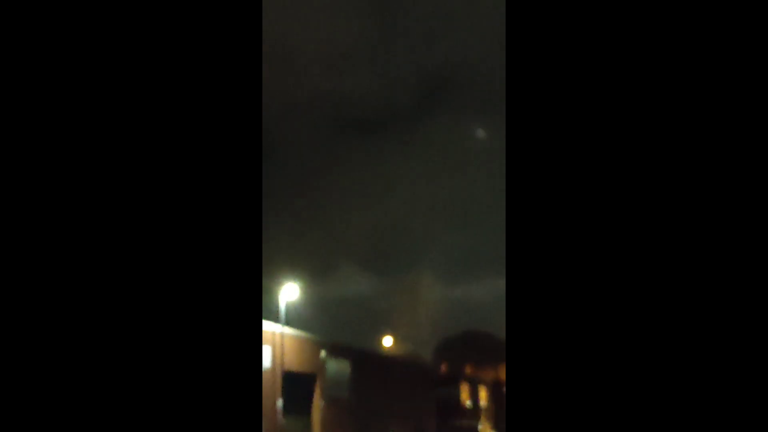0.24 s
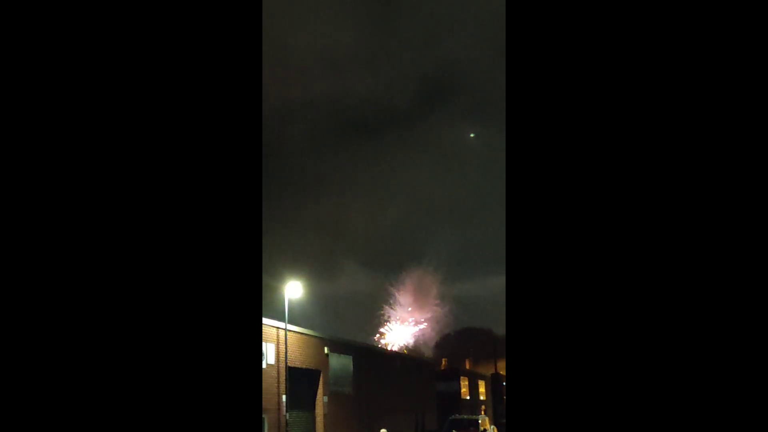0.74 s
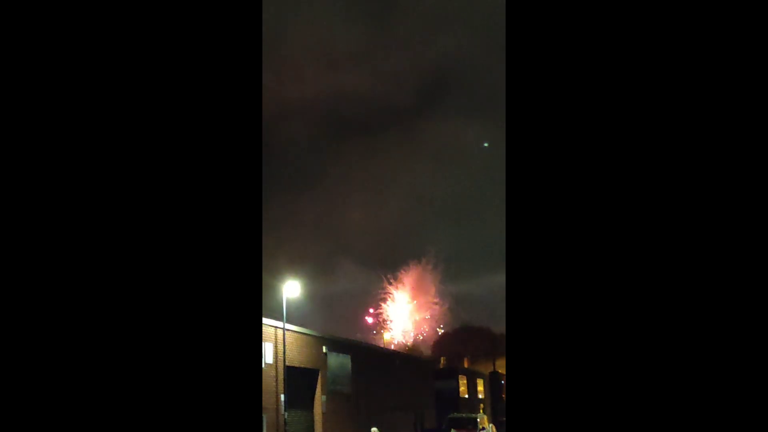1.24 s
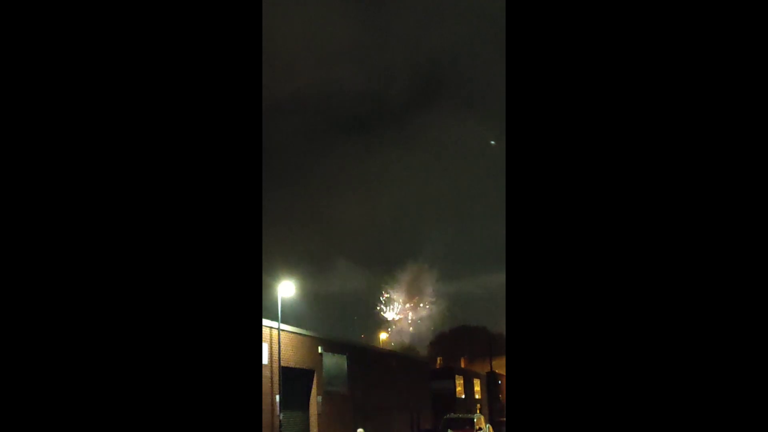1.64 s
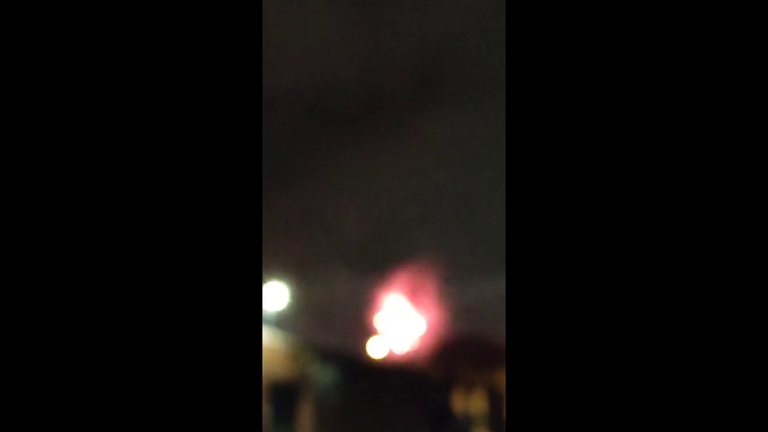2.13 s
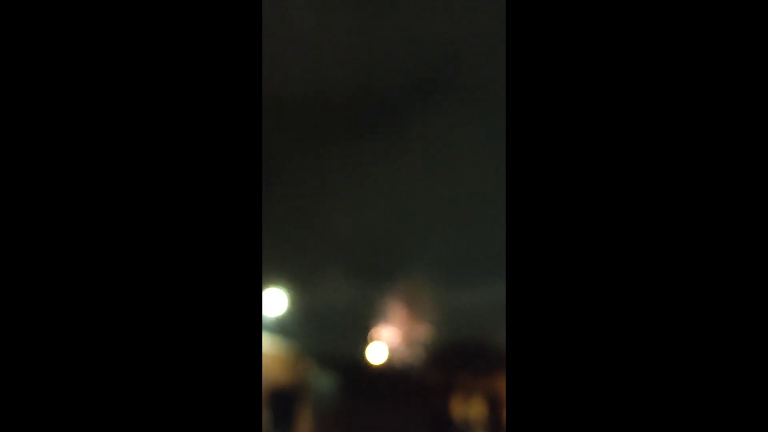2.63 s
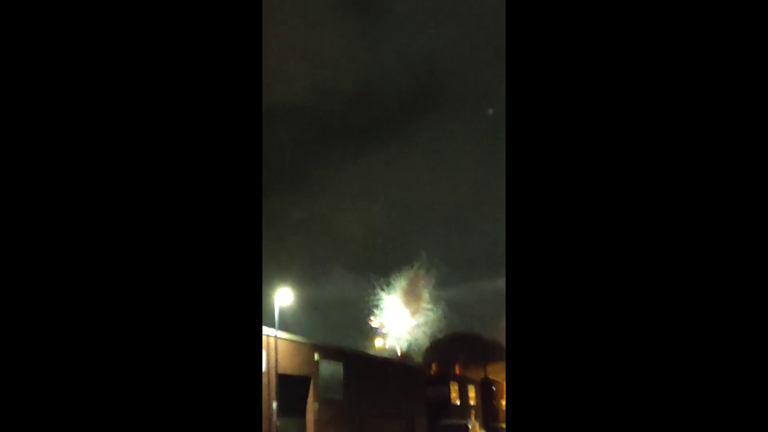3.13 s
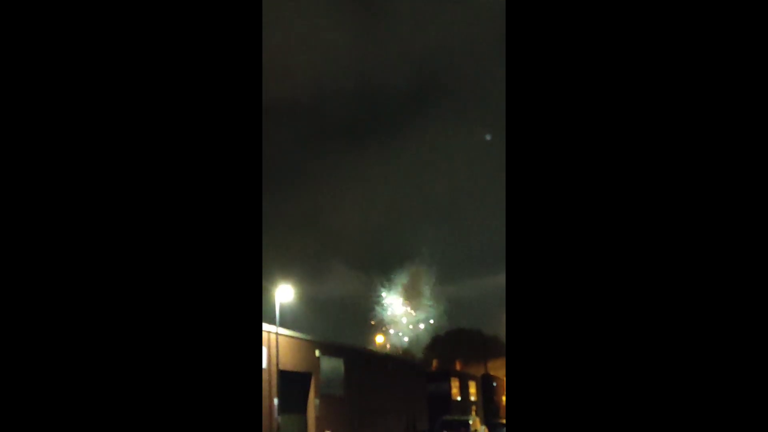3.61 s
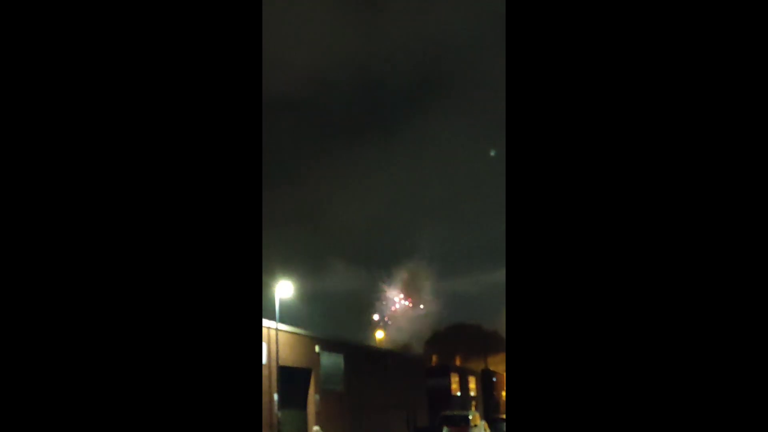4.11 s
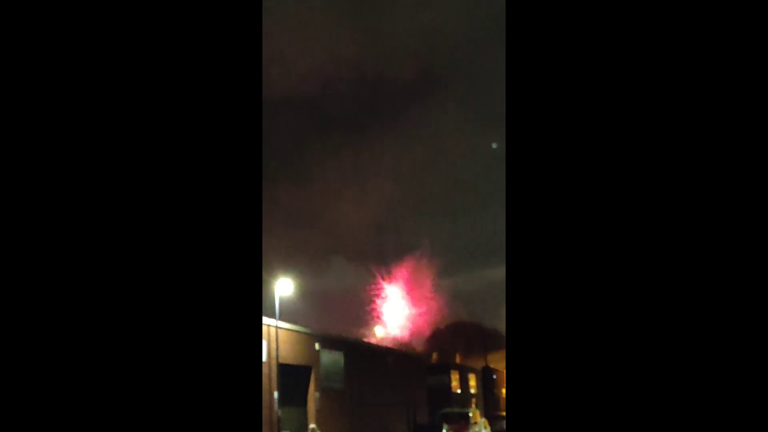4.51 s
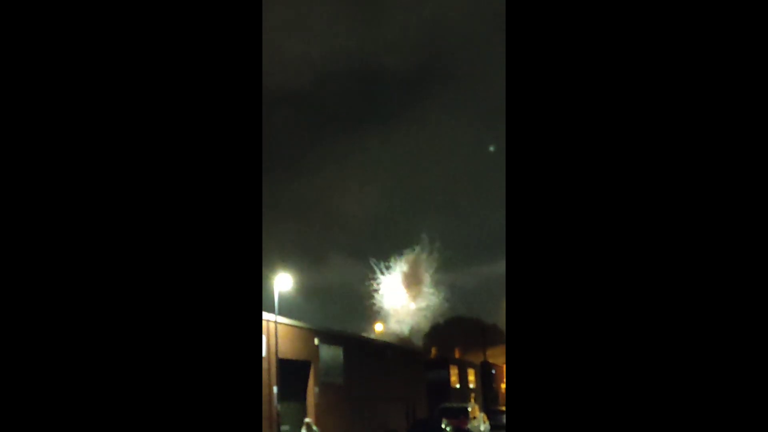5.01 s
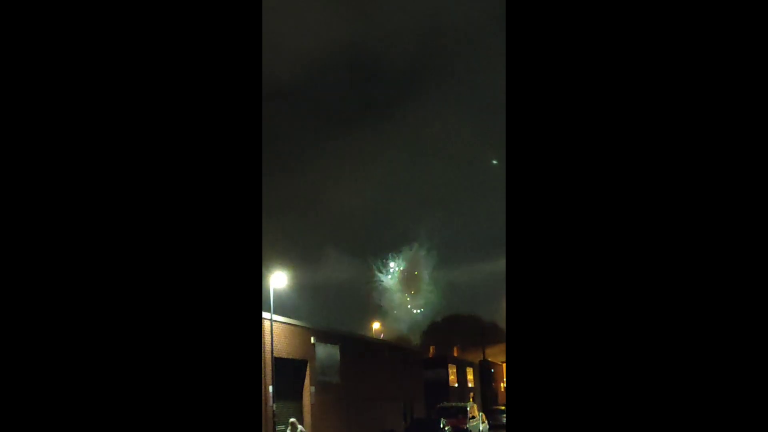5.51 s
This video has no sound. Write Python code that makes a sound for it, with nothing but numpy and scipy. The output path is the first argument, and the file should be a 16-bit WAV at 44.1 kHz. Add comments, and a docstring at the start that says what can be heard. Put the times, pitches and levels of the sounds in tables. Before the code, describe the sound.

Fireworks burst over a town at night, heard outdoors through a phone that slightly clips the loudest peaks. At the start, the echo of an earlier blast is still fading, while small dull pops and fine crackling snaps go off. At about 1.4 seconds comes a loud, sharp double bang, its two hits almost together. Single big bangs follow at roughly 2.0, 2.8, 3.4, 3.9, 4.6 and 5.3 seconds. Each slaps back off nearby house fronts and rolls away within about a second. Softer, duller pops and patches of crackle fill the gaps, and the crackle grows thickest from 5.0 to 5.3 seconds, just before the last bang. A few more pops and snaps trail on to about 5.7 seconds. Throughout, a nearby engine idles with a quiet, low, steady hum over the faint hush of the town.

```python
"""Fireworks over a town at night. First an earlier blast is still rolling back from the houses, while
small pops go off and stars (tiny burning charges) crackle. From 1.4 s on, eight big shells burst: each
blast arrives straight, once more off the ground, then rolls back from the houses. The crackle thickens
just before the last shell. All along, an engine idles nearby over the town's steady hush.
A phone with two microphone ports (small openings) listens and clips the loudest blasts."""
import sys
import numpy as np
from scipy import signal
from scipy.fft import rfft, irfft, next_fast_len
from scipy.io import wavfile
from scipy.ndimage import uniform_filter1d, map_coordinates

SR = 44100
rng = np.random.default_rng(int(sys.argv[2]) if len(sys.argv) > 2 else 0)


def transcribe(u):
    """Save the signal u as a 16-bit wav file named by the first command-line argument.

    u: samples, shape (n,) or (channels, n), limited to [-1, 1]; the rate is SR.
    q: integer samples, one column per channel.
    """
    v = np.clip(np.atleast_2d(u).T, -1, 1)
    q = np.round(v * 32767).astype(np.int16)
    wavfile.write(sys.argv[1], SR, q)


N = 253575

# big shells: (time [s], level [dB], length of the push of air [ms], ground bounce delay [ms])
SHELLS = [(-0.2, -2.5, 0.4, 1.5), (1.4376, -4.5, 0.33, 1.46), (1.4614, -4, 0.6, 1.42),
          (1.9544, -3, 0.42, 1.46), (2.7842, -2, 0.39, 1.46), (3.4282, -3, 0.4, 1.42),
          (3.8781, -3, 0.51, 1.43), (4.5936, -2.5, 0.42, 1.55), (5.3366, -3, 0.47, 1.49)]
# smaller, duller pops, a few of them a shell's blast answered once more by a far wall: (time [s], level [dB],
# length of the push of air [ms], ground bounce delay [ms])
POPS = [(0.0084, -16, 0.65, 1.36), (0.5135, -17, 0.21, 1.3), (0.5417, -24.5, 0.23, 0.82),
        (0.9038, -16.5, 0.78, 1.38), (1.2257, -16, 0.32, 1.64), (1.6722, -12.5, 0.9, 1.14),
        (2.195, -17.5, 0.22, 1.2), (2.2186, -15, 0.24, 1.29), (2.335, -23.5, 0.095, 1.8),
        (2.5125, -14, 0.63, 1.4), (2.7109, -17.5, 0.3, 1.3), (3.5413, -16.5, 0.38, 1.15),
        (4.1656, -14.5, 0.59, 1.56), (4.1851, -19, 0.4, 1.24), (4.974, -20, 0.13, 1.75),
        (5.4041, -20, 0.094, 1.19), (5.4919, -21, 0.085, 1.5), (5.739, -26, 0.041, 1.5)]
# clear stars: (time [s], level [dB], 1 / ground bounce delay [Hz], distance [nearest shells = 1])
CLEAR_STARS = [(0.138, -25, 666, 2.3), (0.235, -26.5, 655, 1.3), (0.263, -29, 651, 0.67),
               (0.278, -32, 668, 0.84), (0.293, -38, 660, 1.4), (0.346, -23.5, 663, 0.84),
               (0.382, -30.5, 730, 0.95), (0.42, -28.5, 646, 0.9), (0.446, -26.5, 686, 1),
               (0.5019, -32, 642, 0.88), (0.759, -29, 658, 2.1), (0.959, -34.5, 1510, 1.8),
               (1.006, -35, 1520, 1.5), (1.1048, -30.5, 1510, 2.6), (1.143, -35, 1500, 2.3),
               (1.2499, -27.5, 1515, 3.9), (1.3063, -30.5, 1500, 4.1), (1.8053, -26, 683, 0.67),
               (1.8187, -23.5, 1500, 1.1), (1.842, -22, 1500, 1.2), (1.895, -23.5, 658, 0.83),
               (1.9138, -23, 710, 1), (2.115, -37, 1500, 0.24), (2.14, -26, 650, 2.5),
               (2.172, -35, 697, 0.93), (2.46, -23.5, 650, 0.76), (2.498, -32, 700, 0.7),
               (2.519, -28, 660, 1.3), (2.5649, -22.5, 636, 1.3), (2.594, -31, 660, 1.1),
               (2.606, -22, 680, 1.5), (2.642, -25, 664, 0.78), (2.687, -25, 680, 1.5),
               (2.719, -27, 660, 0.9), (2.7385, -21.9, 680, 1.8), (2.7697, -20.5, 650, 1),
               (3.1746, -25.5, 658, 1.2), (3.2327, -28, 640, 0.86), (3.2573, -25, 660, 1.2),
               (3.2937, -26, 655, 0.81), (3.3222, -28.5, 645, 1.3), (3.334, -26, 715, 0.92),
               (3.364, -27, 654, 1.6), (3.377, -25.5, 640, 1.3), (3.5254, -22.5, 690, 0.98),
               (3.6702, -30, 1510, 1.23), (3.6882, -25, 1510, 1.5), (3.808, -31, 710, 2.2),
               (4.038, -41, 1540, 1), (4.081, -36, 1553, 1.15), (4.118, -39, 1515, 1.52),
               (4.137, -26.5, 1530, 2), (4.2165, -28, 1480, 1.8), (4.258, -27, 1500, 2.1),
               (4.268, -33.5, 1550, 1.2), (4.429, -38, 1505, 1.3), (4.664, -33, 1454, 1.4),
               (4.834, -32, 1530, 1), (4.936, -35.5, 1500, 0.32), (5.01, -27, 665, 0.7),
               (5.023, -26, 665, 0.62), (5.0476, -25.5, 658, 2.3), (5.058, -24, 660, 0.85),
               (5.102, -23.5, 680, 1.1), (5.119, -24, 660, 1.28), (5.1271, -24, 655, 1.2),
               (5.1447, -24, 650, 0.88), (5.1515, -20, 640, 1), (5.1728, -23.5, 710, 1.6),
               (5.193, -33, 620, 0.74), (5.205, -23.5, 666, 0.91), (5.209, -24, 658, 1.2),
               (5.2288, -24, 658, 3.2), (5.2371, -24, 670, 1.9), (5.259, -20.5, 690, 1.5),
               (5.2692, -20.5, 600, 1.1), (5.2808, -24, 665, 0.99), (5.315, -26, 678, 1.4),
               (5.522, -23, 663, 2), (5.5775, -28, 1550, 1.3), (5.597, -25.5, 1550, 1.1)]
# clouds of faint stars: (time when strongest [s], level [dB], burn-out [dB/s],
# 1 / ground bounce delay [Hz], distance [nearest shells = 1])
STAR_CLOUDS = [(.15, -43.5, 77, 685, 1.03), (.29, -45, 400, 690, 0.85), (.83, -45, 95.5, 680, 2.04),
               (1.04, -50.5, 152, 1460, 2.3), (1.7, -42, 79, 1580, 1.33), (2.2, -45, 39, 692, 0.93),
               (2.6, -44.5, 91, 673, 0.83), (3.15, -49.5, 82, 665, 1), (3.55, -47, 83, 680, 1),
               (4.12, -56, 90, 1506, 1.4), (4.85, -59, 79, 1550, 0.73), (5.201, -44, 166.5, 660, 0.71),
               (5.6, -46, 75, 1610, 1.26)]
# tone of the echo from the walls: (frequency [Hz], relative level [dB])
ECHO_TONE = [(100, -7.5), (300, -6.5), (500, 0), (800, 0.5), (1500, -1.5), (3000, -2), (7000, 3.5),
             (12000, 1.5)]
# how that tone changes as the sound travels on: (frequency [Hz], change [dB/s])
ECHO_CHANGE = [(100, 12), (400, -5), (1000, 7), (3000, -10), (8000, -25)]
# rough walls close by scatter the blast: (delay [s], relative level [dB], half-length [ms])
NEAR_WALLS = [(.001, 11.5, 3.1), (.014, 3.5, 1.1), (.025, 5, 4)]
# far rows of houses answer in dull swells: (delay [s], relative level [dB], half-length [s])
FAR_ROWS = [(0.113, -6, 0.024), (0.18, -5.5, 0.012)]
# flat house fronts mirror the blast: (delay [s], left level [dB], right level [dB])
HOUSE_FRONTS = [(.0137, 14, 19), (.0446, 22, 20), (.0787, 19, 17.5), (.0797, 18, 22.5), (.0942, 17, 19.5)]
# how often the engine fires: (time [s], rate [Hz])
FIRING_RATE = [(0.0, 26.8), (0.43, 27.11), (1.7, 26.83), (2.18, 26.07), (4.13, 26.83), (4.76, 27.35),
               (5.4, 27.25), (5.46, 26.39), (5.75, 27.26)]
# tones in the engine's hum: (multiple of the firing rate, relative level [dB])
ENGINE_TONES = [(0.5, -16), (1, 1.5), (1.5, -21), (2, -1.5), (3, 4.5), (4, -4), (5, -22), (5.5, -24),
                (6, 0), (6.5, -16), (7, 3), (8, -3), (10, -12)]
# the engine's noisy part: (frequency [Hz], relative level [dB])
RUMBLE_TONE = [(15, 5), (40, 8), (120, 8), (250, 5.5), (400, -37)]
# the town's hush: (frequency [Hz], relative level [dB])
HUSH_TONE = [(140, -5), (230, -11), (319, 11), (595, 4), (784, -4.5), (1230, 0), (2210, -13), (2900, -7.5),
             (3470, -15.5), (4120, -24), (6030, -20), (7680, -16), (9280, -34.5), (14300, -31),
             (15000, -77)]
# how alike scattered sound is on the left and right: (frequency [Hz], likeness [0 to 1])
STEREO_LIKENESS = [(60, 0.94), (180, 0.95), (550, 0.9654), (1650, 0.29), (4970, 0.037), (15000, 0.1)]
# surfaces near the phone: (delay [ms], left level [dB], right level [dB])
NEAR_SURFACES = [(2.098, -19, -20.5), (3.399, -59, -13.5), (4.6, -34, -16)]
# ringing of the ports, a left list then a right list: (frequency [Hz], width [Hz], strength [dB])
PORT_RINGS = [
    [(8200, 930, 7)],
    [(1070, 290, -11), (7120, 750, 13)],
]

# ringing of the cupped hand, by where the sound comes from: (frequency [Hz], width [Hz], strength [dB])
CUP_AHEAD, CUP_ASIDE = (1980, 285, 3.5), (3150, 650, 4.4)
STAR_PUSH_MS, LOW_STAR_HZ = 0.14, 1000  # a star whose bounce is sooner than 1 / this burns low
ROLL_DB_PER_S = -26.5  # how fast the town's echo dies away


def blast(push_ms, decay, rise_ms, bounce_db=-np.inf, bounce_ms=0):
    """A jump in air pressure, a push then a suction, with an optional bounce off the ground."""
    def wave(ms):
        age = np.clip(ms, 0, None)
        progress = age / push_ms
        return (1 - progress) * np.exp(-decay * progress) * (1 - np.exp(-age / rise_ms))
    ms = np.arange(600) / SR * 1000
    x = wave(ms) + amp(bounce_db) * wave(ms - bounce_ms)
    x = filtered(x, lambda hz: (1j * hz / (150 + 1j * hz)) ** 2)  # a small charge moves little slow air
    return x / np.max(x)


def bursts(rows, bounce_db, echo_db, thin_hz, dull_hz, decay, rise_ms):
    """Shells or pops: the direct sound with its ground bounce, and the town's echo."""
    direct, echo = np.zeros(N), np.zeros((2, N))
    for s, db, push_ms, bounce_ms in rows:
        bounced = air(blast(push_ms, decay, rise_ms, bounce_db, bounce_ms), thin_hz, dull_hz)
        bare = air(blast(push_ms, decay, rise_ms), thin_hz, dull_hz)
        gain = amp(db) / bounced.max()
        add(direct, gain * bounced, s)
        add(echo, gain * amp(echo_db) * signal.fftconvolve(bare[None], town_echo(), axes=1), s)
    return direct, echo


def star(push_ms, distance):
    """One snap: the tiny charge has no bass, and the further off, the more treble the air takes."""
    edges_hz = 1510, 7950 / max(distance, 0.3)
    snap = blast(push_ms, decay=0.49, rise_ms=0.11)
    return air(air(snap, *edges_hz), *edges_hz)


def star_cloud(t, db, burn_db_per_s, bounce_hz, distance, count=220, swell_s=0.25):
    """One second of faint stars that swell and burn out, and the copy that heads for the ground."""
    draw, height = rng.random((count, 2)), rng.standard_normal(count)
    starts = draw[:, 0] * SR
    sizes = amp(-4.5 * np.log(draw[:, 1] + 0.03))
    bounce_starts = starts + SR / bounce_hz * np.exp(0.1 * height)  # stars hang at different heights
    snap = star(STAR_PUSH_MS, distance)
    ticks = [np.bincount(at.astype(int), sizes, minlength=SR) for at in (starts, bounce_starts)]
    straight, delayed = (signal.fftconvolve(x, snap)[:SR] for x in ticks)
    swell = np.clip(1 + t / swell_s, 0, 1)
    gain = amp(db - burn_db_per_s * np.clip(t, 0, None)) * swell / straight.std()
    return gain * straight, gain * delayed


def crackle():
    """Clear stars over clouds of faint ones: the direct sound (high stars, low stars) and the echo."""
    stars, bounces = np.zeros((2, 2, N))
    for (s, db, bounce_hz, distance), size in zip(CLEAR_STARS, rng.standard_normal(len(CLEAR_STARS))):
        layer = int(bounce_hz > LOW_STAR_HZ)
        snap = star(STAR_PUSH_MS * np.exp(0.2 * size), distance)
        snap = amp(db) * snap / snap.max()
        add(stars[layer], snap, s)
        add(bounces[layer], snap, s + 1 / bounce_hz)
    t = np.arange(SR) / SR - 0.4  # seconds from a cloud's strongest moment
    for s, db, burn_db_per_s, bounce_hz, distance in STAR_CLOUDS:
        layer = int(bounce_hz > LOW_STAR_HZ)
        straight, delayed = star_cloud(t, db, burn_db_per_s, bounce_hz, distance)
        add(stars[layer], straight, s + t[0])
        add(bounces[layer], delayed, s + t[0])
    early_echo = town_echo()[:, :SR // 3]
    echo = signal.fftconvolve(stars.sum(axis=0)[None], early_echo, axes=1)[:, :N]
    return stars + soft_ground(bounces), amp(-40.5) * echo


def soft_ground(x, dull_hz=3540):
    """Soft ground sends a snap back weaker and duller."""
    return filtered(x, lambda hz: amp(-7.5) / (1 + 1j * hz / dull_hz) ** 2)


def town_echo(roll_start_s=0.061, roll_rise_s=0.03, rows_dull_hz=1320):
    """The town's answer to a click: slaps off walls, dull swells from far rows, a lumpy fading roll."""
    hz, t, bands = signal.stft(scattered(int(1.2 * SR), ECHO_TONE), SR, nperseg=256)
    patches = uniform_filter1d(rng.standard_normal(bands.shape[1:]), size=3, axis=0)
    patches = unit(uniform_filter1d(patches, size=7, axis=1))  # uneven in pitch and in time
    change_db = along(ECHO_CHANGE, hz)[:, None] * t + 2.28 * patches
    tail = signal.istft(bands * amp(change_db), SR, nperseg=256)[1]
    s = np.arange(tail.shape[1]) / SR
    slaps = sum(amp(db) * np.exp(-((s - at) * 1000 / ms) ** 2) for at, db, ms in NEAR_WALLS)
    swells = sum(amp(db) * np.exp(-((s - at) / width) ** 2) for at, db, width in FAR_ROWS)
    near, far = amp(-4), amp(-6) * np.clip((s - roll_start_s) / roll_rise_s, 0, 1)
    roll = (near + far) * amp(ROLL_DB_PER_S * s - 0.5 * wobble(42.5)[:len(s)])
    dull = filtered(tail, lambda hz: 1 / (1 + (hz / rows_dull_hz) ** 4))
    return tail * (slaps + roll) + dull * swells + house_fronts(len(s), strays=30)


def house_fronts(n, strays):
    """Clean slaps off flat house fronts, then off stray ones at random distances, fading with the roll."""
    slaps, draw = np.zeros((2, n)), rng.random((strays, 3))
    delay_s = 0.085 + 0.5 * draw[:, 0]
    stray_db = 11.5 + ROLL_DB_PER_S * delay_s - 4 * np.log(draw[:, 1] + 0.043)
    lean_db = 6 * (draw[:, 2] - 0.5)
    for s, left_db, right_db in [*HOUSE_FRONTS, *zip(delay_s, stray_db + lean_db, stray_db - lean_db)]:
        slaps[:, round(s * SR)] += amp([left_db, right_db])
    return air(slaps, thin_hz=520, dull_hz=6000)


def engine():
    """An idling engine: wavering tones tied to its firing rate, the higher ones lagging, plus rumble."""
    firing_hz = np.interp(np.arange(N) / SR, *np.transpose(FIRING_RATE))
    firings = np.cumsum(firing_hz * (1 + 0.0056 * wobble(8.5))) / SR
    hum = sum(amp(db + 0.2 * wobble(3.7)) * np.sin(2 * np.pi * (k * firings - 0.13 * k * k))
              for k, db in ENGINE_TONES)
    return amp(-38.5) * (unit(hum) + amp(-7) * scattered(N, RUMBLE_TONE))


def town_hush():
    """Soft noise from all around, its level drifting a little."""
    return amp(-49 + 2.36 * wobble(3.03)) * scattered(N, HUSH_TONE)


def arrival(hz):
    """Direct sound bounces off nearby surfaces and reaches the right port a little later."""
    def delay(ms):
        return np.exp(-2j * np.pi * hz * ms / 1000)
    surfaces = sum(amp([[left], [right]]) * delay(ms) for ms, left, right in NEAR_SURFACES)
    hand = [[0], [amp(-16)]] * delay(0.45)  # the hand reflects into the right port
    return (1 + surfaces + hand) * delay(np.array([[0], [0.075]]))


def cupped_hand(x, cup):
    """The hand cupped round the phone rings into the right port."""
    return filtered(x, lambda hz: 1 + [[0], [1]] * resonance(hz, *cup))


def ports(hz, cutoff_hz=7500):
    """Each microphone port rings at its own pitches and loses the top treble steeply."""
    rings = [1 + sum(resonance(hz, *ring) for ring in port) for port in PORT_RINGS]
    ratio = hz / cutoff_hz
    return rings / (1 - ratio * ratio + 1.3j * ratio) ** 2


def air(x, thin_hz, dull_hz):
    """Weaken the bass below thin_hz and the treble above dull_hz."""
    return filtered(x, lambda hz: (1j * hz / (thin_hz + 1j * hz)) ** 2
                    * (dull_hz / (dull_hz + 1j * hz)) ** 3)


def resonance(hz, centre, width, db):
    """A filter shape that rings around one frequency."""
    return amp(db) * 1j * hz * width / (centre * centre - hz * hz + 1j * hz * width)


def scattered(n, tone):
    """Stereo noise whose two sides are alike in the bass and unrelated in the treble."""
    def shape(hz):
        spread = np.arccos(np.clip(along(STEREO_LIKENESS, hz), -1, 1)) / 2
        return amp(along(tone, hz)) * [np.cos(spread), np.sin(spread)]
    mid, side = filtered(rng.standard_normal((2, n)), shape)
    return unit(np.array([mid + side, mid - side]))


def amp(db):
    """Turn decibels into a multiplier."""
    return 10 ** (np.asarray(db) / 20)


def unit(x):
    """Scale x to an average strength (rms) of 1."""
    return x / np.sqrt(np.mean(x ** 2) + 1e-20)


def along(points, hz):
    """Read between (frequency, value) points on a pitch-like scale."""
    freqs, values = np.transpose(points)
    return np.interp(np.log(hz + 1), np.log(freqs + 1), values)


def wobble(rate):
    """A smooth curve through `rate` random values a second."""
    return map_coordinates(rng.standard_normal(int(N * rate / SR) + 4), [np.arange(N) * rate / SR])


def filtered(x, response):
    """Scale and delay each frequency of x as response(hz) says."""
    n = x.shape[-1]
    padded = next_fast_len(n + 4096)
    return irfft(rfft(x, padded) * response(np.fft.rfftfreq(padded, 1 / SR)), padded)[..., :n]


def add(into, x, s):
    """Mix x in from time s on."""
    i = round(s * SR)
    part = x[..., max(-i, 0):][..., :N - max(i, 0)]
    into[..., max(i, 0):max(i, 0) + part.shape[-1]] += part


def scene():
    """Shells, pops and high stars come from ahead, low stars and echoes from the side, over the town."""
    shells, shell_echo = bursts(SHELLS, bounce_db=-4, echo_db=-38.5, thin_hz=5, dull_hz=11800,
                                decay=0.94, rise_ms=0.12)
    pops, pop_echo = bursts(POPS, bounce_db=-8.5, echo_db=-46.5, thin_hz=365, dull_hz=4140,
                            decay=1.0, rise_ms=0.24)
    (high_stars, low_stars), star_echo = crackle()
    ahead = cupped_hand(filtered(shells + pops + high_stars, arrival), CUP_AHEAD)
    aside = cupped_hand(low_stars + shell_echo + pop_echo + star_echo, CUP_ASIDE)
    return filtered(ahead + aside, ports) + engine() + town_hush()


def record(dry):
    """The phone rounds off the loudest peaks and passes nothing above 15600 Hz."""
    clipped = dry / (1 + np.abs(dry / 0.9) ** 6) ** (1 / 6)
    return filtered(clipped, lambda hz: hz < 15600)


dry = scene()
out = record(dry)
transcribe(out)
```